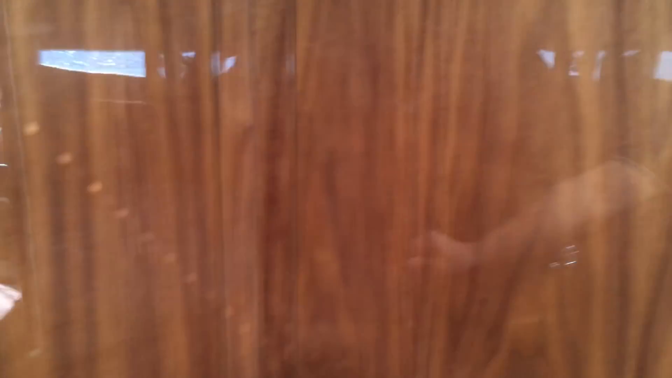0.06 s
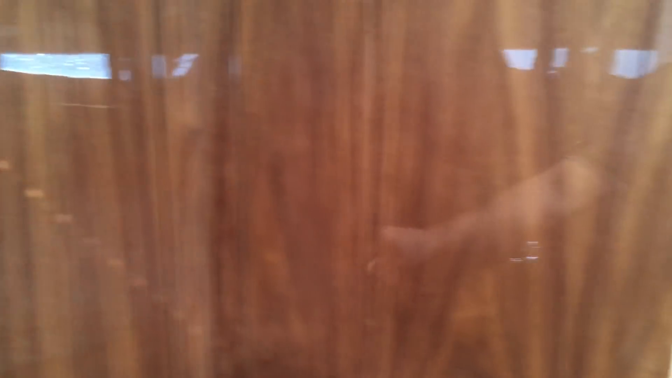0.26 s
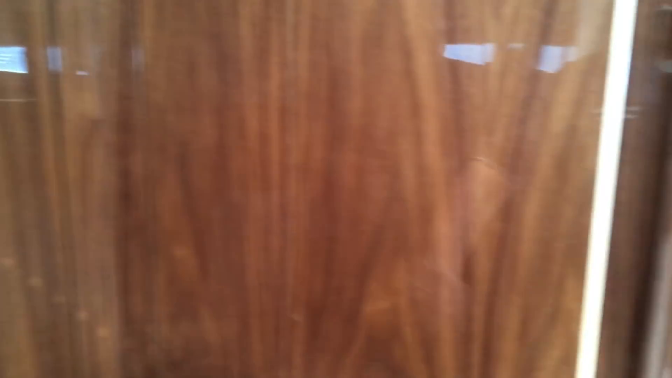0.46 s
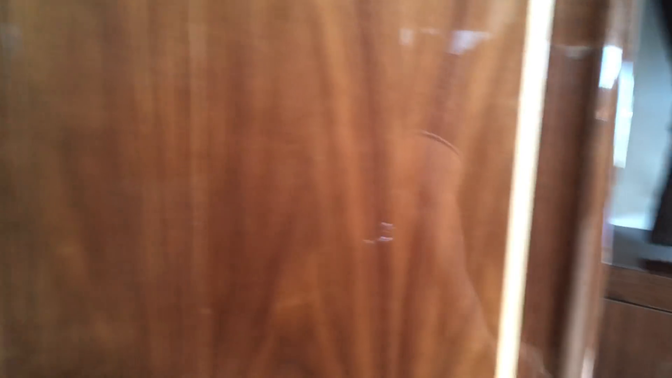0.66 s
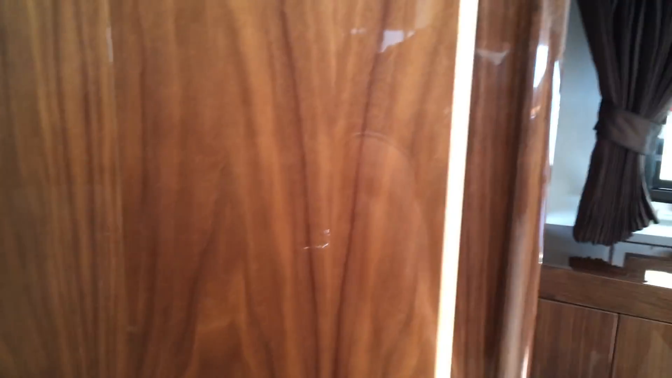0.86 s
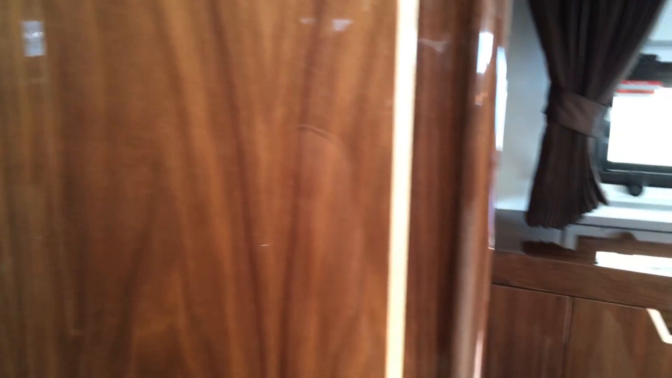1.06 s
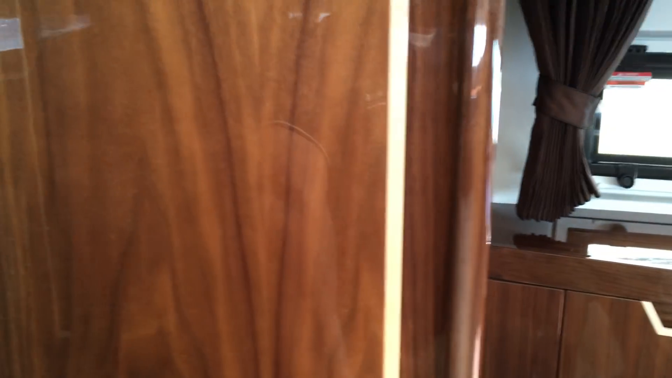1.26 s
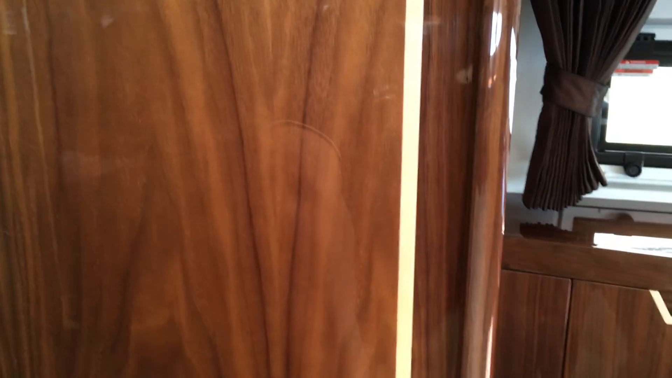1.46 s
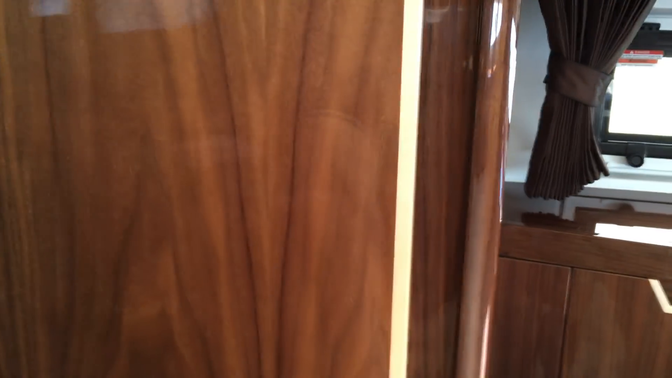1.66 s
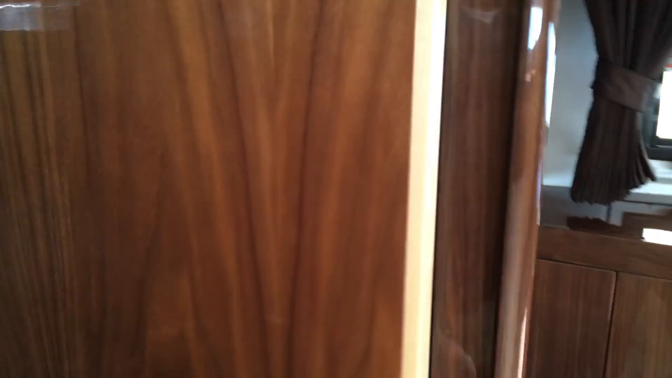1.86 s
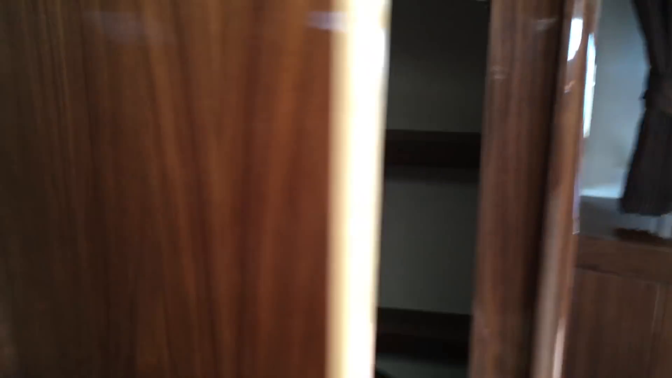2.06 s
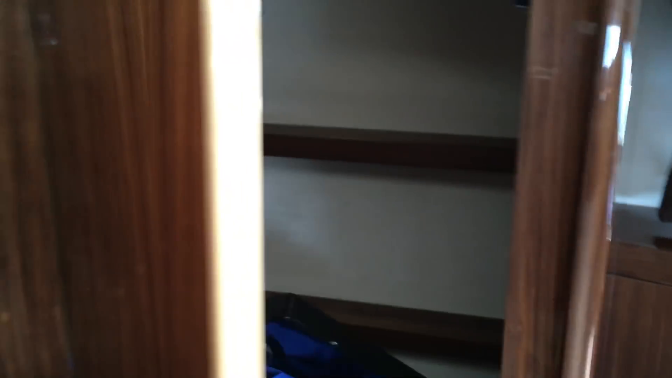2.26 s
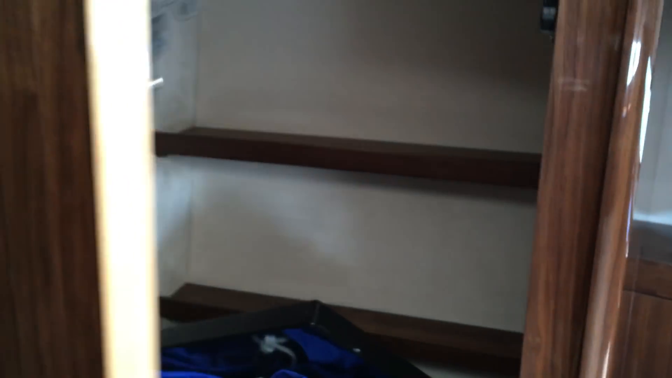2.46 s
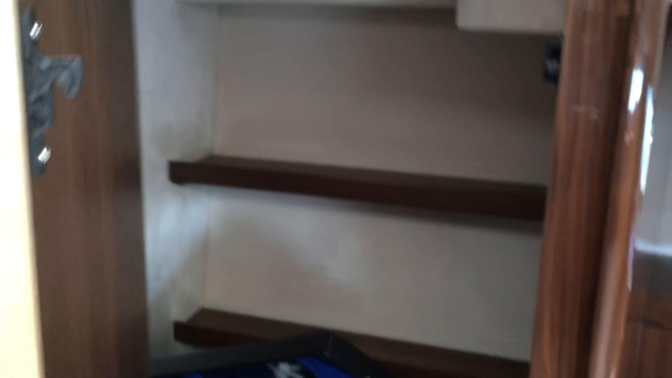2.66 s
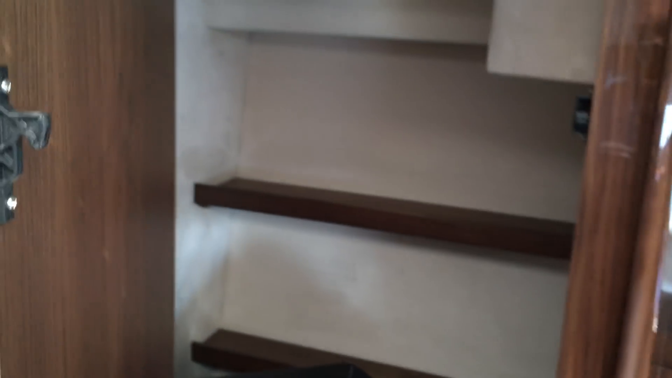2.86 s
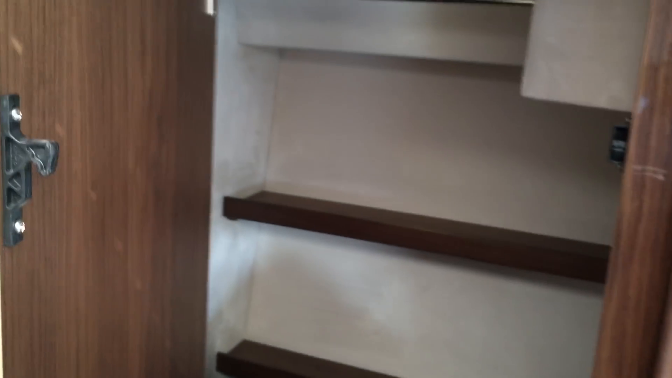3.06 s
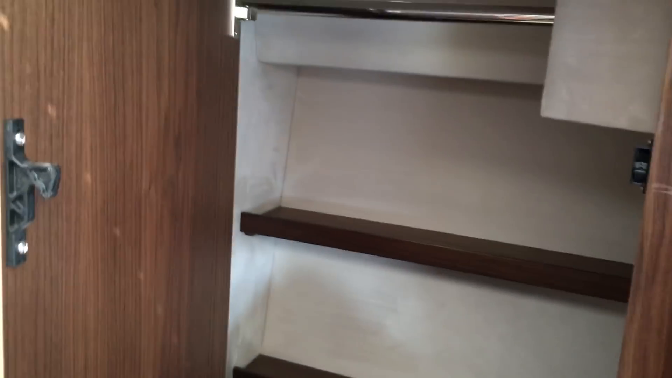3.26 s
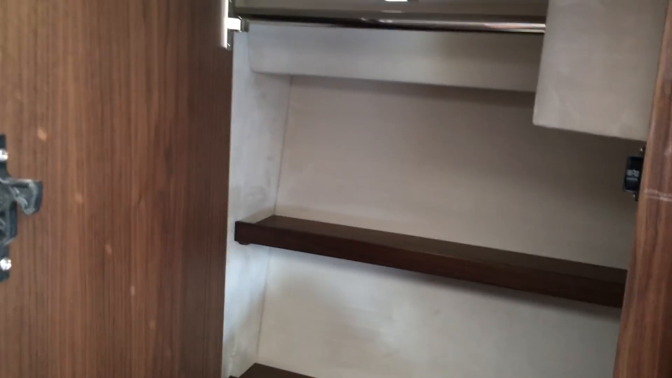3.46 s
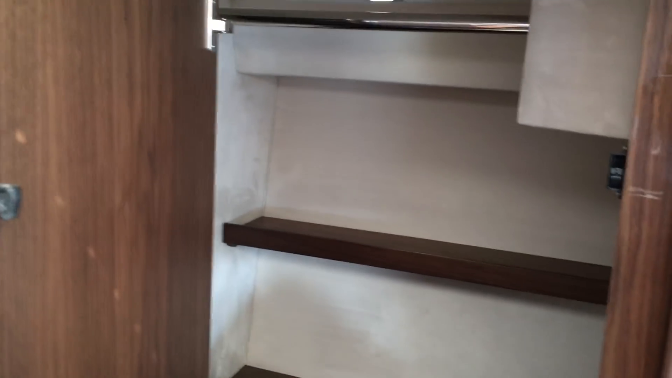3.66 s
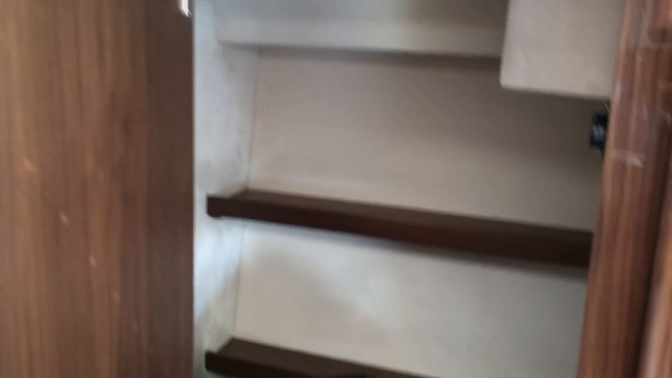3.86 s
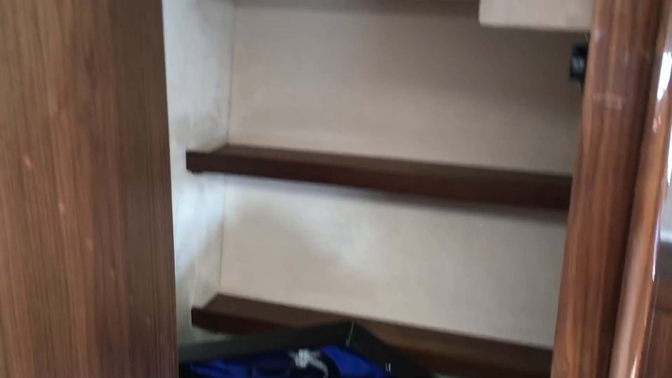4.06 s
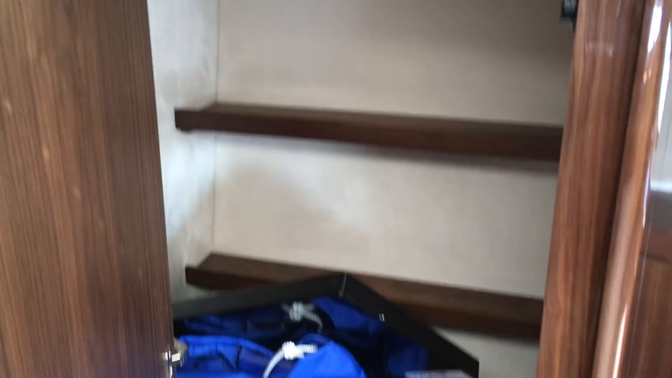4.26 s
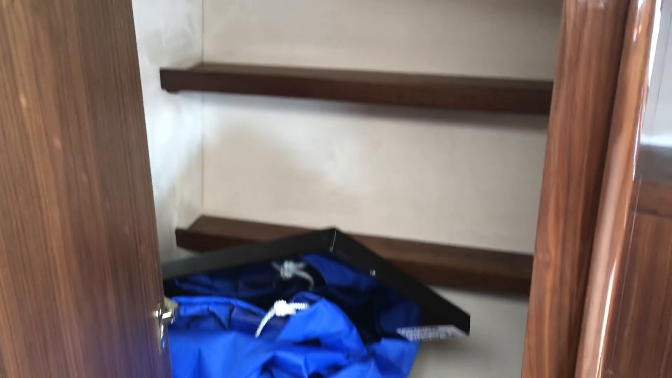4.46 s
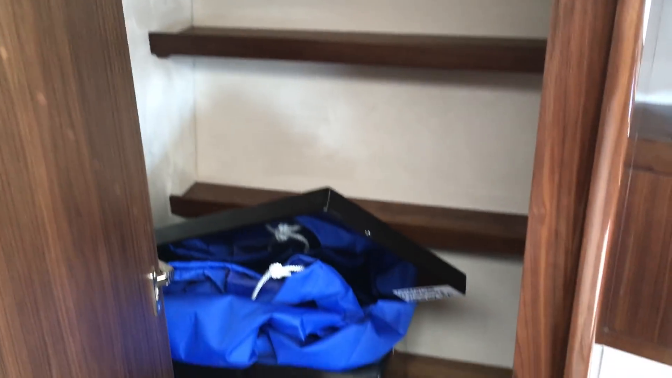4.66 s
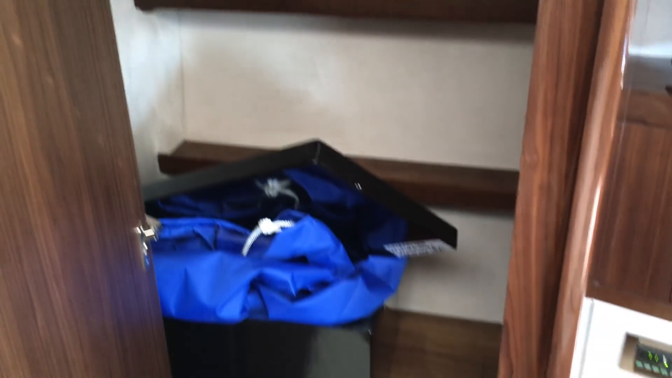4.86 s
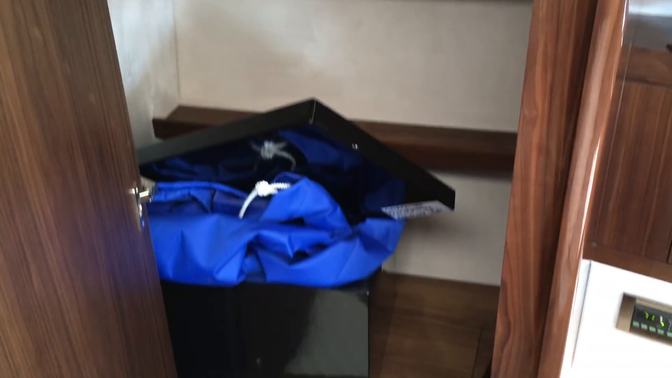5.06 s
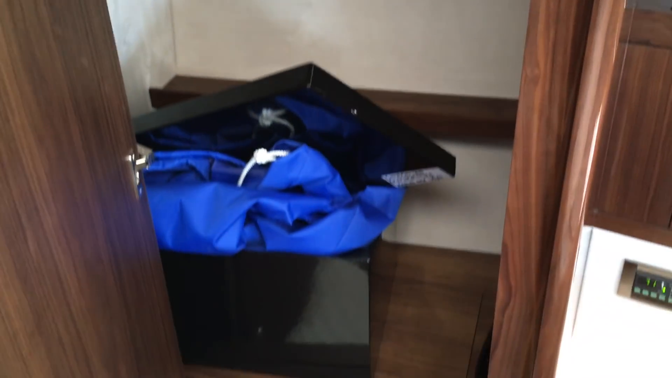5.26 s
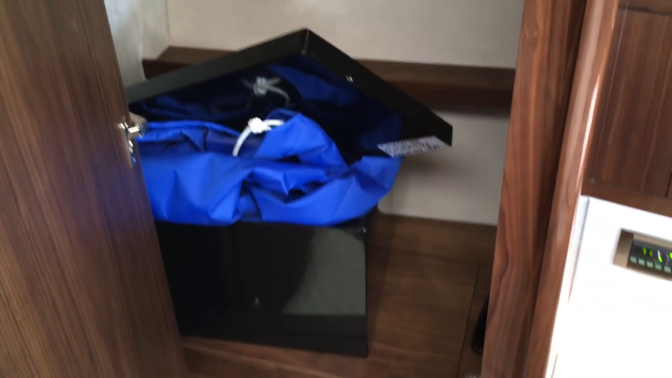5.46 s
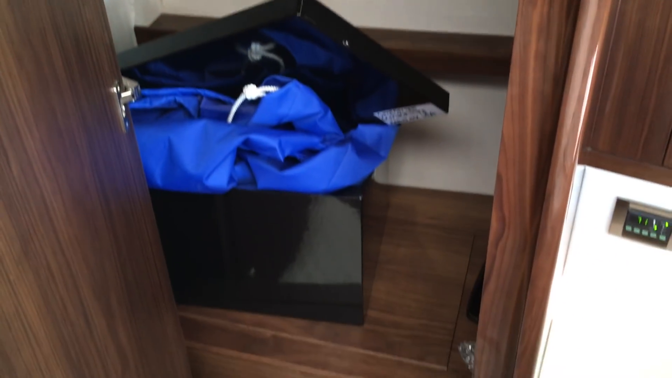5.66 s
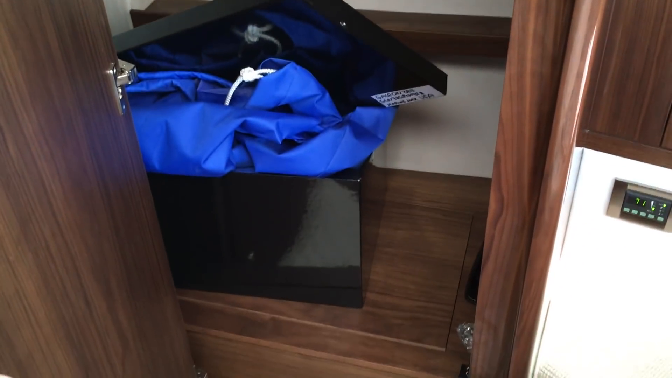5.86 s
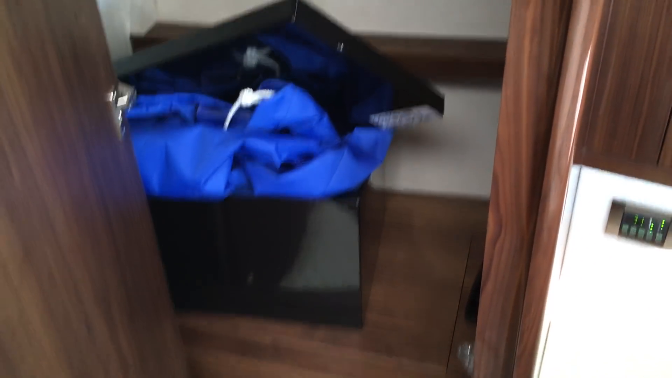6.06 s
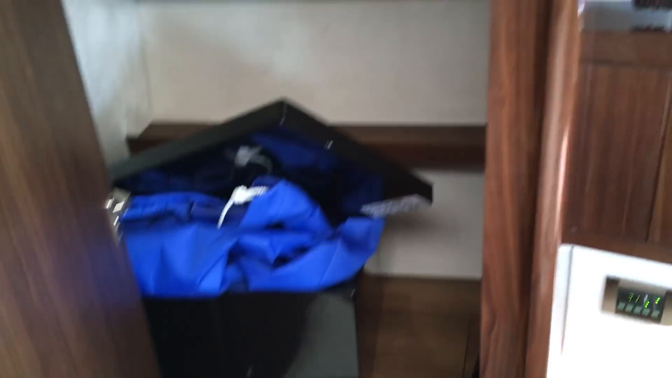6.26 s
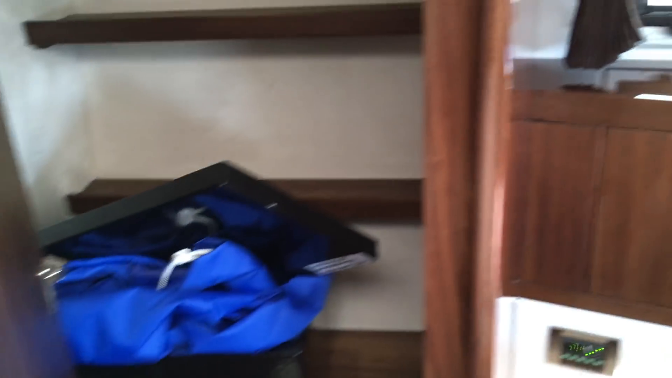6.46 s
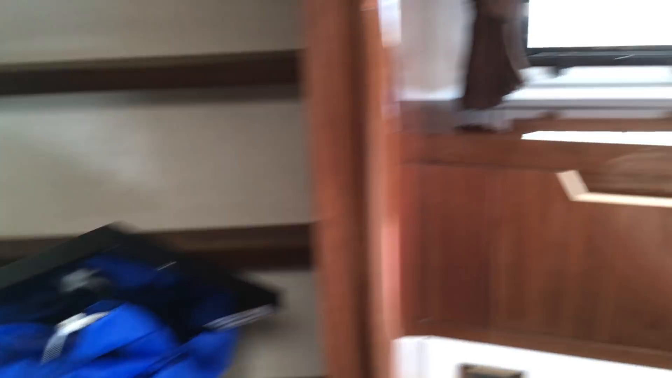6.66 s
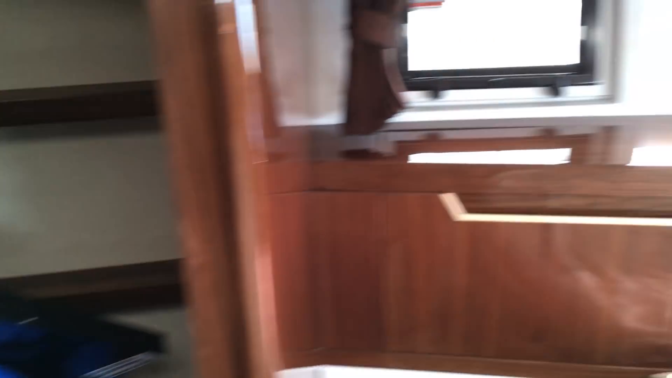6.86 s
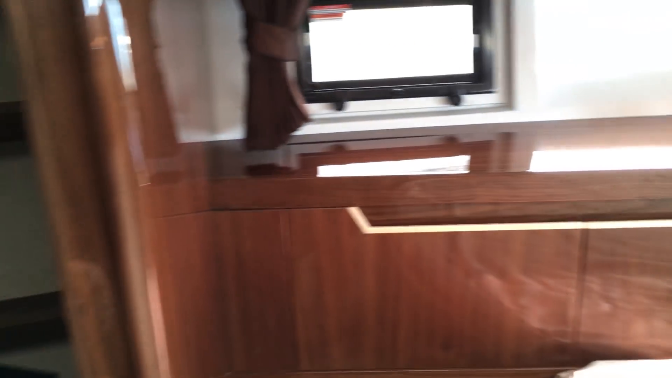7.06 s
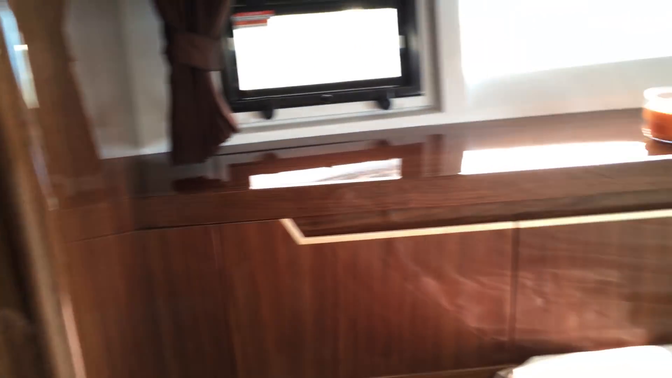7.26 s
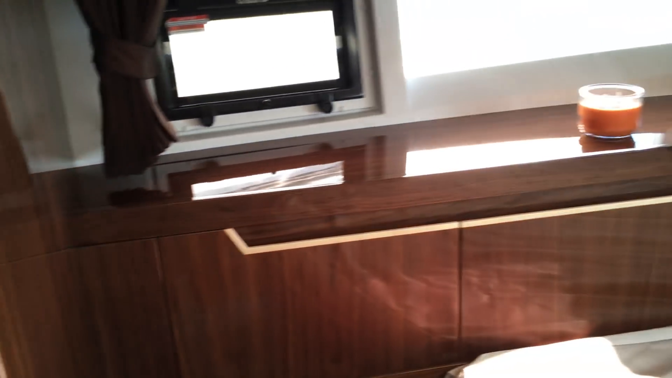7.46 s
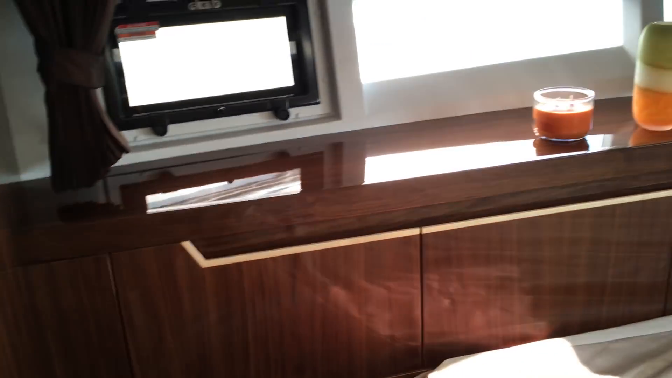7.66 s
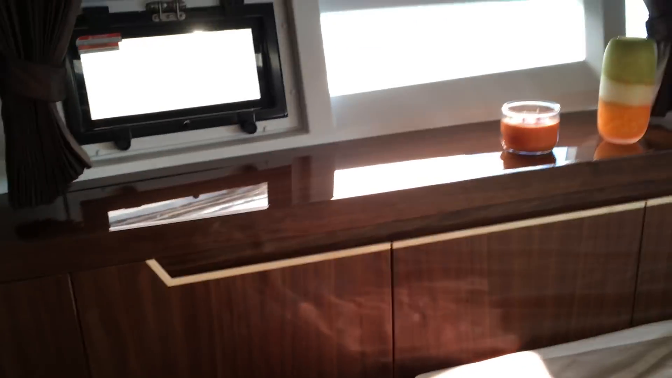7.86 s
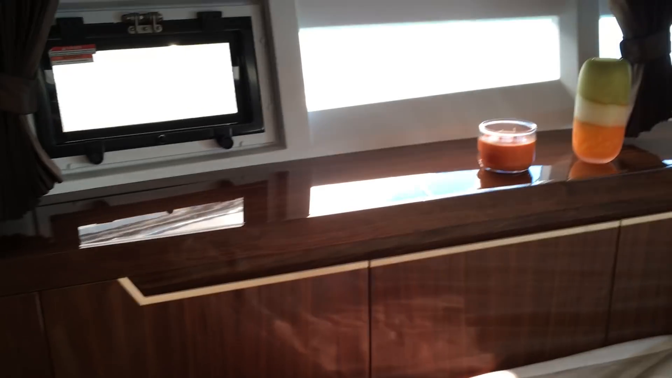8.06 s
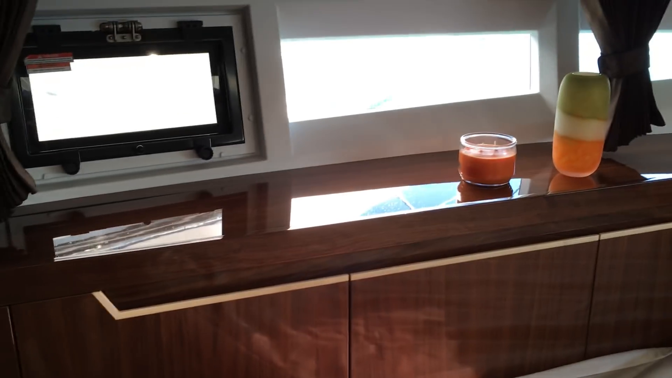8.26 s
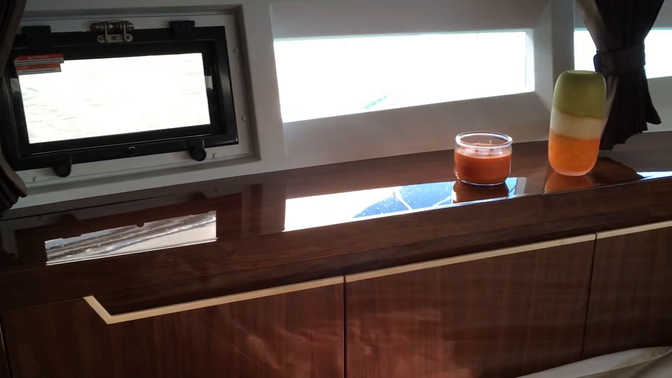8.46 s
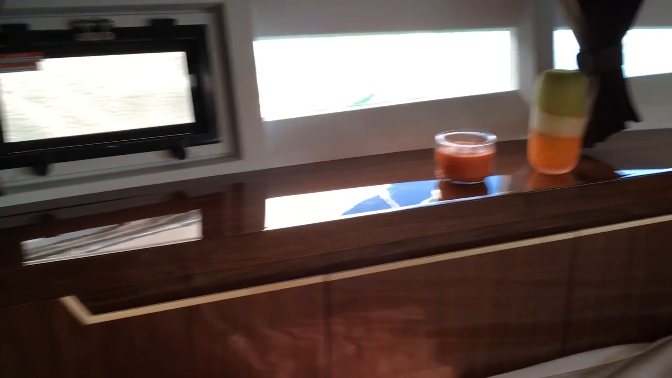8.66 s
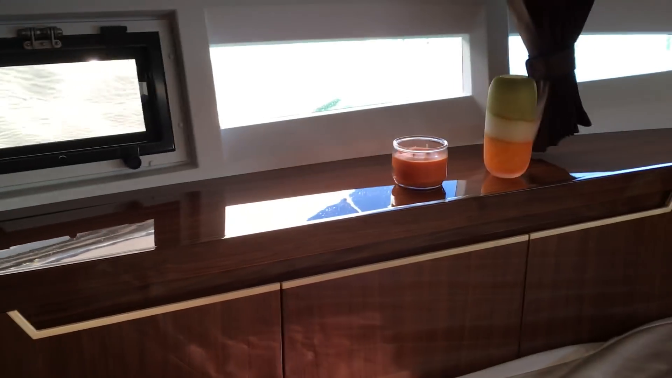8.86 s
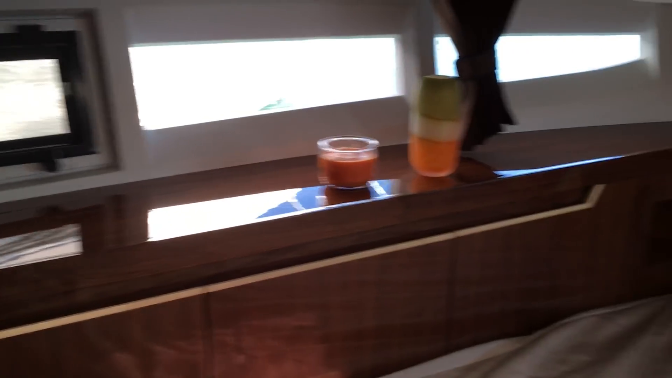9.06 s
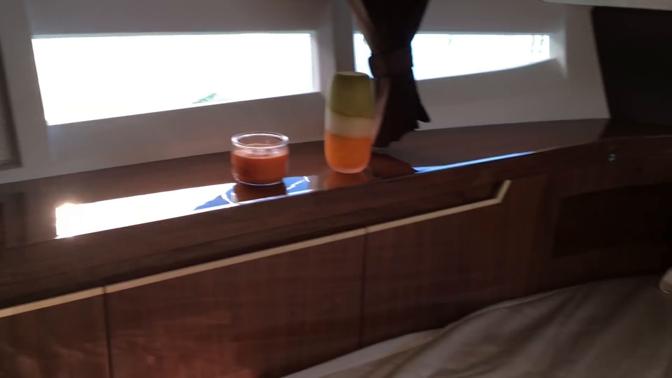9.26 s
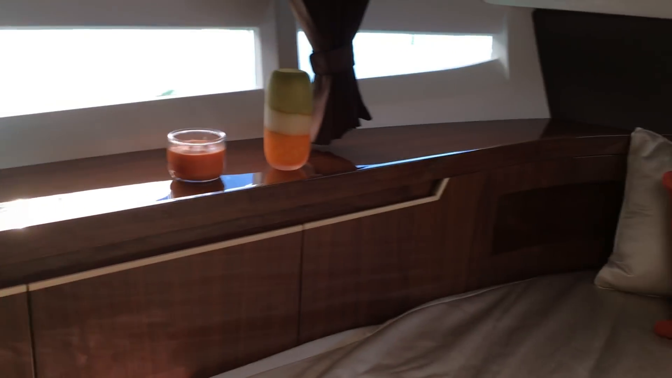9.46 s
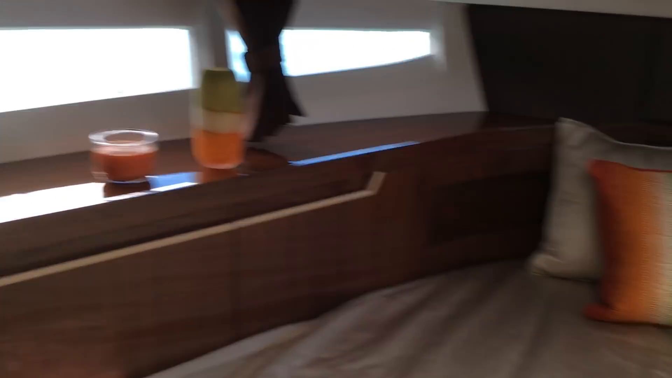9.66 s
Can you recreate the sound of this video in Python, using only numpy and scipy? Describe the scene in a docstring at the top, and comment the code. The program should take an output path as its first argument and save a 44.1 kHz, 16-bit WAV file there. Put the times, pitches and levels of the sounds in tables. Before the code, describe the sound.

In a small wood-lined boat cabin, low ventilation rumble and motor hum run throughout under a faint hiss. A knock's tail fades, a spring catch snaps and the door panel booms. Fumbling clicks and dull knocks follow, then a tiny hinge creak and a long quiet stretch. Near the end the door bangs shut, the loudest moment, followed by soft rustles. Close handheld microphone, briefly ducking on the bang.

```python
"""Varnished cabinet door in a small boat cabin. Ventilation rumbles, hums and hisses throughout, as shaped noise and sines.
At the very start the tail of a knock dies away (banded noise, a dull contact and a push). Then the spring catch
snaps (ringing modes and rattle) and the door panel booms (low modes under half-sine pushes). From 1.4 to 2.5 s the
hand fumbles the catch; at 3.1 s the hinge creaks once (stick-slip clicks into modes); near 8.7 s come the loudest bangs.
Soft rustles (banded noise) come in between and near the end. The microphone's limiter ducks on loud peaks, recovers slowly."""
import sys
import numpy as np
from scipy import signal
from scipy.fft import rfft, irfft
from scipy.io import wavfile

SR = 44100
rng = np.random.default_rng(int(sys.argv[2]) if len(sys.argv) > 2 else 0)


def output_pcm(signal):
    """Save a mono or channel-first signal as 16-bit PCM at the path in sys.argv[1].

    Samples are clipped to [-1, 1] before scaling.
    """
    pcm = np.clip(np.atleast_2d(signal).T, -1, 1) * 32767
    wavfile.write(sys.argv[1], SR, np.round(pcm).astype(np.int16))


N = 428192


def from_db(db):
    """Amplitude ratio of a level in dB."""
    return 10 ** (np.asarray(db) / 20)


def rms_one(x):
    """Scale to rms 1."""
    return x / np.sqrt(np.mean(x ** 2) + 1e-20)


def at_hz(points, hz):
    """Read the second column of a table at hz, linear in log frequency."""
    points = np.array(points)
    return np.interp(np.log(hz), np.log(points[:, 0]), points[:, 1])


def drift(rate_hz):
    """Slow random curve of rms 1: noise through two equal low-pass poles, at 1/40 of the sample rate."""
    step, settle = 40, 2000
    pole = np.exp(-2 * np.pi * rate_hz * step / SR)
    white = rng.standard_normal(N // step + settle + 2)
    slow = signal.lfilter([1], [1, -2 * pole, pole * pole], white)[settle:]
    return np.interp(np.arange(N) / step, np.arange(len(slow)), rms_one(slow))


def band(x, low_hz, high_hz):
    """Butterworth band-pass."""
    edges_hz = [low_hz, min(high_hz, 0.45 * SR)]
    return signal.sosfilt(signal.butter(2, edges_hz, "band", fs=SR, output="sos"), x)


def ring(clicks, hz, t60_s):
    """Damped resonator: a unit click starts a decaying sine of height 1."""
    radius = from_db(-60 / (t60_s * SR))
    angle = 2 * np.pi * hz / SR
    return signal.lfilter([0, np.sin(angle)], [1, -2 * radius * np.cos(angle), radius ** 2], clicks + 1e-18)


def train(times_s, sizes):
    """Clicks of the given sizes at the given times."""
    clicks = np.zeros(N)
    np.add.at(clicks, (np.asarray(times_s) * SR).astype(int), sizes)
    return clicks


def shaped_noise(spectrum):
    """Steady noise with the given spectrum, rms 1."""
    hz = np.maximum(np.arange(N // 2 + 1) * SR / N, 1)
    return rms_one(irfft(rfft(rng.standard_normal(N)) * from_db(at_hz(spectrum, hz)), N))


# ventilation level as the microphone turns about: time_s, air_db, hum_db
VENT_LEVELS = [(0, -29.5, -38), (0.401, -37, -35.5), (1.3, -34, -30), (1.9, -35, -34.5), (3.9, -35, -29),
               (5.701, -35.5, -31), (7.598, -35, -33.5), (8.5, -33, -38), (9.1, -33, -32),
               (9.71, -34, -37.5)]
# duct rumble spectrum: pitch_hz, relative density_db [dB per Hz]
RUMBLE_SPECTRUM = [(12, -72), (20, -49.5), (38, -12), (86, 0), (117, -5), (132, -5), (147, -6.5),
                   (226, -12), (291, -16.5), (323, -21.5), (353, -27.5), (386, -27.5), (410, -25.5),
                   (483, -38.5), (700, -36), (910, -56), (1540, -120)]
# air hiss spectrum: pitch_hz, relative density_db [dB per Hz]
HISS_SPECTRUM = [(210, -39), (350, 2), (387, -12), (420, -10), (565, -15), (869, -14.5), (944, -17),
                 (1430, -18), (1600, -20), (1740, -22.5), (2460, -21.5), (2760, -24), (6010, -28.5),
                 (16500, -38), (18200, -58)]
HISS_START_DB, HISS_SLOPE_DB_PER_S = -52, -0.1869
HISS_FOLLOWS = 0.25   # share of the air level's swing, in dB


def ventilation():
    """Duct rumble, motor hum, reflected air hiss and faint tones, each with its own level curve."""
    t = np.arange(N) / SR
    time_s, air_points, hum_points = np.transpose(VENT_LEVELS)
    air_db = np.interp(t, time_s, air_points)
    hum_db = np.interp(t, time_s, hum_points)
    rumble = from_db(air_db + 1.0 * drift(9.6)) * shaped_noise(RUMBLE_SPECTRUM)
    hiss_db = HISS_START_DB + HISS_SLOPE_DB_PER_S * t
    hiss_db = hiss_db + HISS_FOLLOWS * (air_db - air_db.mean()) + 0.53 * drift(4.1)
    hiss = from_db(hiss_db) * reflections(shaped_noise(HISS_SPECTRUM), echo_db=-12.5, sway=0.018)
    return rumble + hiss + from_db(hum_db) * hum() + narrow_tones(waver_db=1.5)


# mains hum partials: pitch_hz, level_db [rms, relative to hum_db]
HUM_PARTIALS = [(120, -5.5), (240, -24)]


def hum():
    """Sines of fixed pitch, slightly wavering in level."""
    t = np.arange(N) / SR
    return sum(from_db(db + 0.5 * drift(4.0)) * np.sqrt(2) * np.sin(2 * np.pi * (hz * t + rng.random()))
               for hz, db in HUM_PARTIALS)


def reflections(x, echo_db, sway, count=5):
    """Close hard walls echo within milliseconds; lags creep as the microphone moves, so comb stripes wander."""
    n = np.arange(N)
    out = x.copy()
    dull = band(x, low_hz=206.4, high_hz=5470)   # cushions and curtains take the top off
    for lag_s in rng.uniform(0.001, 0.012, count):
        lag = lag_s * SR * (1 + sway * drift(0.21))
        out += from_db(echo_db) * np.interp(n - lag, n, dull)
    return rms_one(out)


# faint tones in the air noise: pitch_hz, level_db, width_hz [about 5.5 dB down], peak_s, half_s [to 1/e]
AIR_TONES = [(155.4, -46, 8, 1, 1.5), (353.7, -58.5, 7, 14, 8), (796, -70.5, 7.7, 2.6, 2.1),
             (931, -63.5, 40, 9.5, 0.55), (1015, -63.5, 6.1, 0.9, .35), (1033, -67, 3, 4.5, 2.5),
             (1033, -66, 3.7, 7.8, 0.66), (1218, -69, 12.6, 2.6, 0.42), (1599, -65, 16, 5.7, 0.99),
             (2030, -66, 21, 2.95, 0.31), (2001, -74, 37, 6.6, 2.9), (2483, -68.5, 91, 0.62, .42),
             (2460, -67.5, 140, 5.8, 0.98)]


def narrow_tones(waver_db):
    """Noise in narrow resonances, each swelling and fading under a bell curve."""
    t = np.arange(N) / SR
    out = np.zeros(N)
    for hz, db, width_hz, peak_s, half_s in AIR_TONES:
        tone = rms_one(ring(rng.standard_normal(N), hz, t60_s=3.5 / width_hz))
        out += from_db(db + waver_db * drift(0.93)) * np.exp(-((t - peak_s) / half_s) ** 2) * tone
    return out


# first the tail of a knock, then soft rustles, probably cloth and skin, and faint high hisses:
# peak_s, half_s [to 1/e], level_db, low_hz, high_hz
NOISE_STROKES = [(0.003, 0.023, -36.5, 700, 13500), (0.507, 0.1, -52, 500, 15700),
                 (2.103, 0.042, -58, 990, 11500), (3.354, 0.066, -70, 10550, 12500),
                 (6.997, 0.16, -72, 10800, 12050), (9.149, 0.096, -56, 1470, 16500),
                 (9.644, 0.046, -56, 2380, 16600)]


def knock_tail_and_rustles():
    """Noise with a fast random level for grain, banded under bell-shaped strokes."""
    t = np.arange(N) / SR
    grain = rng.standard_normal(N) * from_db(3.5 * drift(70))
    return sum(from_db(db) * np.exp(-((t - peak_s) / half_s) ** 2) * rms_one(band(grain, low_hz, high_hz))
               for peak_s, half_s, db, low_hz, high_hz in NOISE_STROKES)


# contacts of catch and door edge, the first a dull one in the knock's tail: start_s,
# knock_db [relative, near 1.6 kHz], hardness_db [11 kHz over knock], wood_db [500 Hz over knock], favoured_hz
CATCH_CONTACTS = [(0.0054, -26, -11, -0.5, 2000), (0.1606, -10.5, 18.5, -7, 4410),
                  (0.1884, -6.5, 12.5, 1.5, 3080), (0.2059, -4, -2.5, -7, 1975), (0.2194, -11, -5, 9, 1200),
                  (0.3773, -40.5, 2, -6, 4230), (1.4274, -38, -3, -8, 4230), (1.461, -19, -5, -13.5, 1737),
                  (1.554, -23.5, 6.5, -5, 2240), (1.57, -19, 6, -15, 2300),
                  (1.6343, -17.5, 16.5, -12, 1420), (1.657, -13.5, -14, -16, 2000),
                  (1.662, -11, 7, -9, 3520), (1.732, -9.5, 6, 1, 2750), (1.998, -40, -10, -6, 920),
                  (2.0947, -33, 10.5, -13, 2729), (2.1604, -44, -17, 2.5, 640),
                  (2.4491, -38, -12.5, -3, 640), (4.9173, -45, 18.5, 4, 5200),
                  (4.926, -39.5, 2.5, -12, 4230), (8.0469, -43.5, 19.5, -15, 5280),
                  (8.359, -45, -2.5, -1, 2530), (8.3956, -21, 2, -24, 2354), (8.412, -25.5, -24, -6, 880),
                  (8.6853, -8.5, 13, -16, 4230), (8.7, -2, 5.5, -18, 2770), (8.7057, -10, -10, -8, 880),
                  (8.715, 4.5, -11, -28, 1497), (8.7253, 0.5, -12, -7.5, 1480),
                  (8.7383, -1.5, -8.5, -4, 1660), (8.913, -44, -3, -18, 2250)]
SNAP_SHARE = 0.76   # share of the hardness reached at 4.5 kHz


def contact_db(hz):
    """Strength of every contact at one pitch: hardness sets the treble, wood the bass."""
    _, knock_db, hardness_db, wood_db, _ = np.transpose(CATCH_CONTACTS)
    rows = zip(knock_db + wood_db, knock_db, knock_db + SNAP_SHARE * hardness_db, knock_db + hardness_db)
    return np.array([np.interp(np.log(hz), np.log([500, 1600, 4500, 11000]), row) for row in rows])


# door edge and metal catch modes: pitch_hz, level_db [relative], t60_s [before the cap]
CATCH_MODES = [(442, 7, 0.1), (537, -10, 0.11), (626, 0.5, 0.12), (880, -3, 0.093), (1202, -10, 0.078),
               (1439, -9.5, 0.14), (1737, -6, 0.06), (1986, -11.5, 0.12), (2330, -16.5, 0.13),
               (2443, -4, 0.11), (2750, -9.5, 0.072), (3080, -13, 0.034), (3610, -14.5, 0.09),
               (4230, -24.5, 0.017), (4670, -13, 0.045), (5280, -11, 0.032), (6080, -13.5, 0.034),
               (8730, -11, 0.024)]
# dense rattle and cabin walls: pitch_hz, t60_s
RATTLE_DECAY = [(300, 0.16), (1000, 0.13), (3000, 0.096), (7000, 0.088), (16000, 0.037)]
# rattle colour: pitch_hz, level_db [per band, relative]
RATTLE_TILT = [(300, 2.5), (3000, 0.5), (6000, -7.5), (10000, -5), (17000, -18)]
T60_CAP_S, FAVOUR_DB, MODE_SPREAD_DB, CRACK_DECAY_S = 0.095, 13, 2.5, 0.00098   # crack: energy to 1/e
TAIL_SHARE = 0.27   # energy of the rattle tail against the crack


def catch(mode_db, scatter_db):
    """Contacts ring the modes, most the one nearest favoured_hz, and set off a rattle dying sooner in the treble."""
    contacts, modes = np.array(CATCH_CONTACTS), np.array(CATCH_MODES)
    times_s = contacts[:, 0]
    chance_db = MODE_SPREAD_DB * rng.standard_normal((len(times_s), len(modes)))
    favoured = np.abs(np.log(contacts[:, -1:] / modes[:, 0])).argmin(axis=1)
    out = np.zeros(N)
    for k, (hz, db, t60_s) in enumerate(CATCH_MODES):
        click_db = contact_db(hz) + db + mode_db + FAVOUR_DB * (favoured == k) + chance_db[:, k]
        out += ring(train(times_s, from_db(click_db)), hz, min(t60_s, T60_CAP_S))

    edges_hz = 420 * 2 ** np.arange(0, 5.6, 0.5)   # half-octave bands
    white = rng.standard_normal((2, N))   # neighbouring bands take different noise
    for k, (low_hz, high_hz) in enumerate(zip(edges_hz, edges_hz[1:])):
        hz = np.sqrt(low_hz * high_hz)
        blow_db = contact_db(hz) + at_hz(RATTLE_TILT, hz) + scatter_db
        blows = train(times_s, from_db(2 * blow_db)) + 1e-18   # energies add
        tail_pole = from_db(-120 / (at_hz(RATTLE_DECAY, hz) * SR))
        tail = signal.lfilter([1], [1, -tail_pole], blows)
        crack = signal.lfilter([1], [1, -np.exp(-1 / (CRACK_DECAY_S * SR))], blows)
        rattle = band(white[k % 2] * np.sqrt(TAIL_SHARE * tail + crack), low_hz, high_hz)
        out += rattle * np.sqrt(SR / 2 / (high_hz - low_hz))   # undo the band-pass loss
    return out


# shoves of the panel, each a run of bounces: strongest_s, level_db [relative], contact_ms [strongest],
# fall_db [times the square of the bounce's distance from the strongest]
PANEL_PUSHES = [(0.019, -25.5, 2.4, 3.5), (0.194, -6, 0.92, 15), (0.22, -2, 2.5, 24),
                (0.241, -3.5, 3.4, 15.5), (0.291, -9, 8.3, 25), (0.975, -19.5, 9.9, 28),
                (1.476, -8.5, 12.2, 24), (1.605, -12, 12.4, 25), (1.68, -21.5, 1.5, 7),
                (2.181, -16.5, 7.3, 6), (8.355, -22.5, 6.6, 30), (8.417, -19.5, 6.1, 13),
                (8.707, -8.5, 2.3, 24), (8.717, 0, 5, 23), (8.752, 8, 5.7, 4.5)]
# door panel modes: pitch_hz, level_db [relative], t60_s
PANEL_MODES = [(63, -14.5, 0.33), (88.4, -9.5, 0.39), (102, -15, 0.39), (117.34, 3.5, 0.15),
               (159.4, -1, 0.19), (189.8, -1.5, 0.11), (203, -7, 0.15), (278.7, -13.5, 0.15),
               (353.8, -19, 0.054)]
BOUNCE_GAP_S, SOFTENING = 0.0172, 1.15   # each contact lasts SOFTENING times the one before


def panel():
    """Half-sine pushes (a light touch, the shove, its bounces) shake the low modes of the door panel."""
    force = np.zeros(N)
    for strongest_s, db, contact_ms, fall_db in PANEL_PUSHES:
        for k in range(-1, 4):
            length = int(contact_ms * SOFTENING ** k * SR / 1000)
            pulse = np.sin(np.linspace(0, np.pi, length))
            start = max(int((strongest_s + k * BOUNCE_GAP_S) * SR), 0)
            force[start:][:length] += from_db(db - fall_db * k ** 2) * pulse / pulse.sum()
    motion = sum(from_db(db) * ring(force, hz, t60_s) for hz, db, t60_s in PANEL_MODES)
    return band(motion, low_hz=56, high_hz=2000)   # a loose panel radiates no deep bass


# hinge modes: pitch_hz, level_db [relative], t60_s
HINGE_MODES = [(1000, -6, .015), (1250, -6, .015), (1500, 0, .028), (1800, -6, .015), (2200, -5, .015)]
CREAK_FROM_S, CREAK_PEAK_S, CREAK_SIGMA_S, CREAK_DB = 3.13, 3.355, 0.09, -44.5
FIRST_GAP_S, LAST_GAP_S, GAP_JITTER, SLIP_S = 0.02, 0.0095, 0.15, 0.0003


def creak(count=21):
    """Stick-slip: uneven slips, on the whole closer and closer, each a soft jerk that rings the hinge briefly."""
    chance = rng.standard_normal((count, 2))
    gaps_s = np.linspace(FIRST_GAP_S, LAST_GAP_S, count) * (1 + GAP_JITTER * chance[:, 0])
    times_s = CREAK_FROM_S + np.cumsum(gaps_s)
    swell = np.exp(-((times_s - CREAK_PEAK_S) / CREAK_SIGMA_S) ** 2 / 2)
    slips = train(times_s, from_db(CREAK_DB + 2 * chance[:, 1]) * swell)
    scuff = np.hanning(int(SLIP_S * SR))
    jerks = np.convolve(slips, scuff / scuff.sum())[:N]
    return sum((-1) ** k * from_db(db) * ring(jerks, hz, t60_s)
               for k, (hz, db, t60_s) in enumerate(HINGE_MODES))


def scene():
    """Sum of all sources, one channel."""
    door = catch(mode_db=-12.5, scatter_db=-10.5) + panel() + creak()
    return (ventilation() + knock_tail_and_rustles() + door)[None]


# notches of the microphone housing: pitch_hz, width_hz, level_db
HOUSING_NOTCHES = [(4880, 460, -7), (10450, 810, -6.5)]
LIMIT_DB, RELEASE_DB_PER_S, ATTACK_S, CUTOFF_HZ = 2, 19.5, 0.00044, 18500


def record(dry):
    """Housing notches, a limiter that recovers slowly, soft overload, steep top cut."""
    x = dry[0]
    for hz, width_hz, db in HOUSING_NOTCHES:
        x = x + (from_db(db) - 1) * signal.lfilter(*signal.iirpeak(hz, hz / width_hz, SR), x)
    over_db = np.maximum(20 * np.log10(np.abs(x) + 1e-9) - LIMIT_DB, 0)
    ramp_db = RELEASE_DB_PER_S * np.arange(N) / SR
    held_db = np.maximum.accumulate(over_db + ramp_db) - ramp_db   # falls back at a steady rate
    pole = np.exp(-1 / (ATTACK_S * SR))
    duck_db = signal.lfilter([1 - pole], [1, -pole], held_db)
    limited = x * from_db(-duck_db)
    overloaded = np.tanh(limited / 1.098) * 1.131
    top_cut = signal.cheby2(12, 70, CUTOFF_HZ, fs=SR, output="sos")
    return signal.sosfilt(top_cut, overloaded)[None]


dry = scene()
out = record(dry)
output_pcm(out)
```